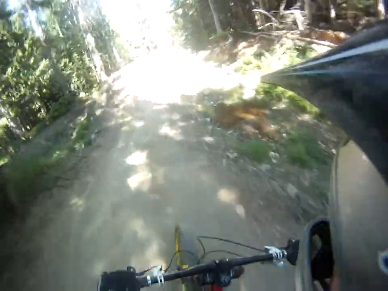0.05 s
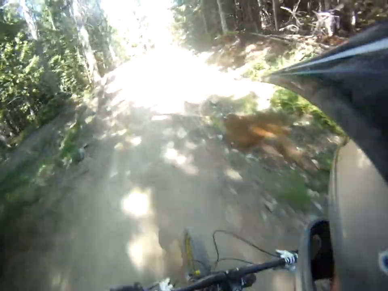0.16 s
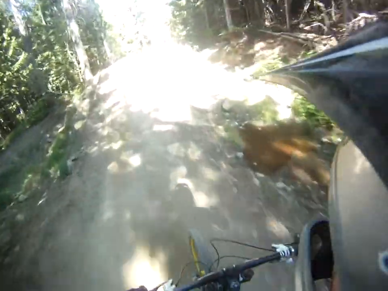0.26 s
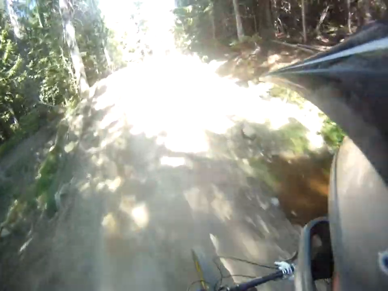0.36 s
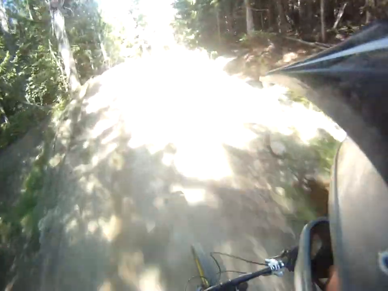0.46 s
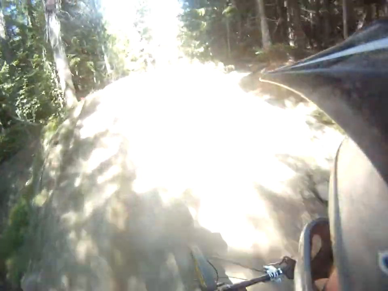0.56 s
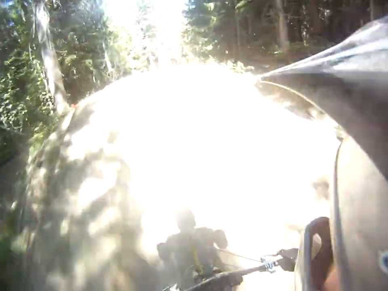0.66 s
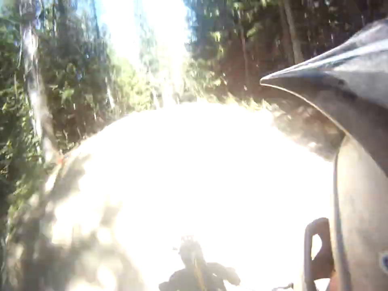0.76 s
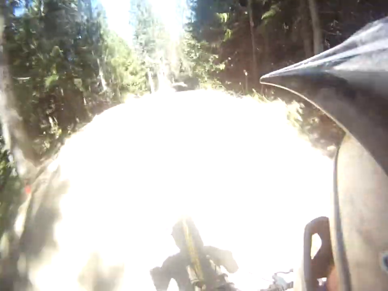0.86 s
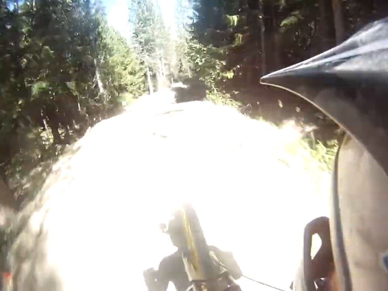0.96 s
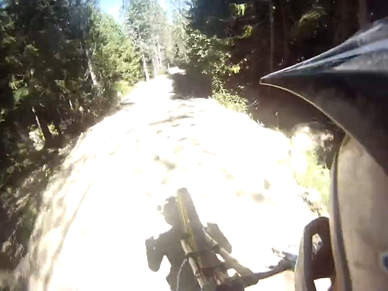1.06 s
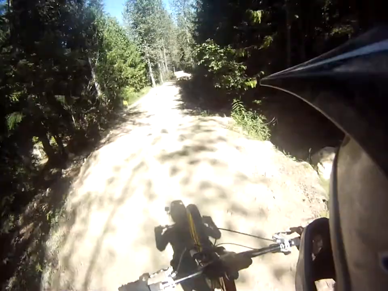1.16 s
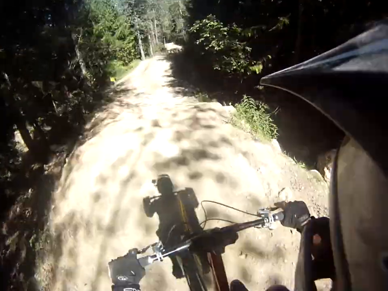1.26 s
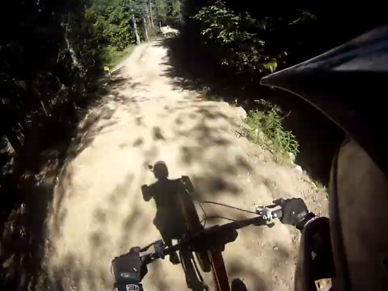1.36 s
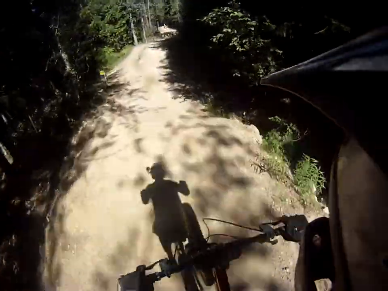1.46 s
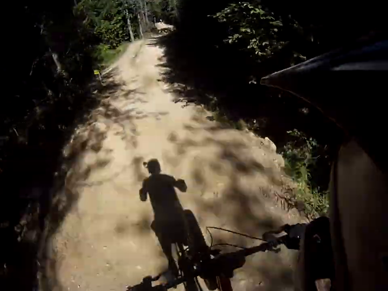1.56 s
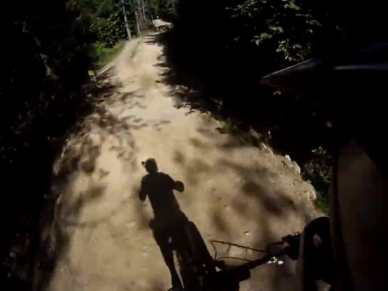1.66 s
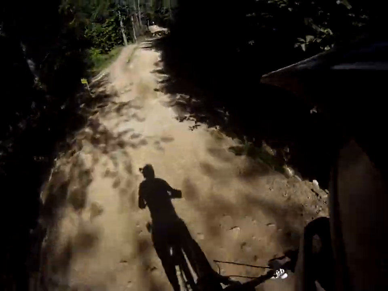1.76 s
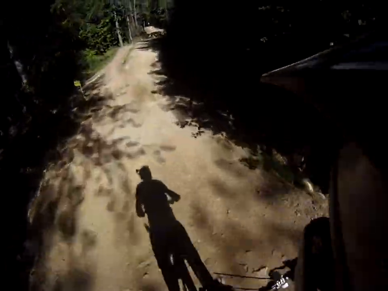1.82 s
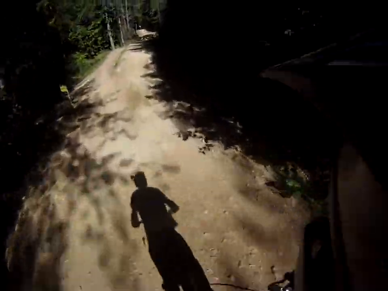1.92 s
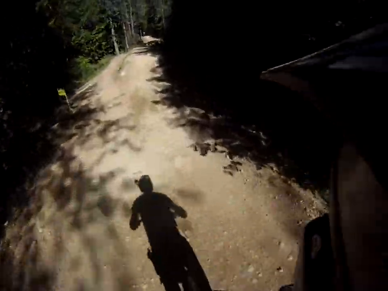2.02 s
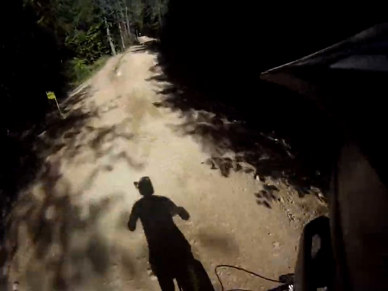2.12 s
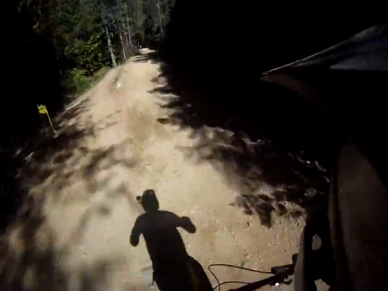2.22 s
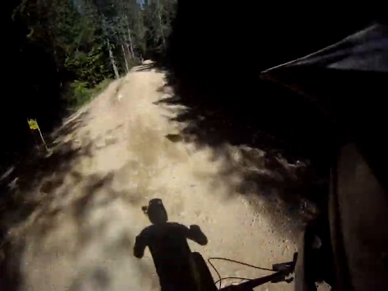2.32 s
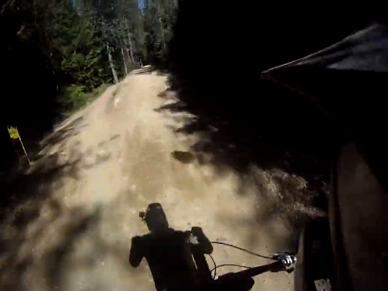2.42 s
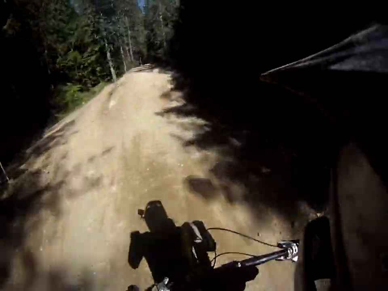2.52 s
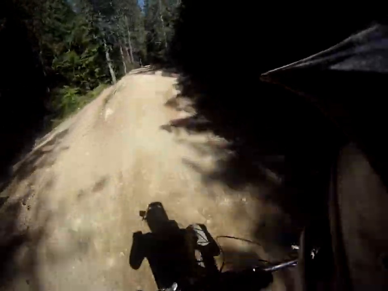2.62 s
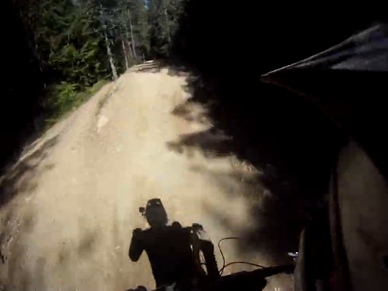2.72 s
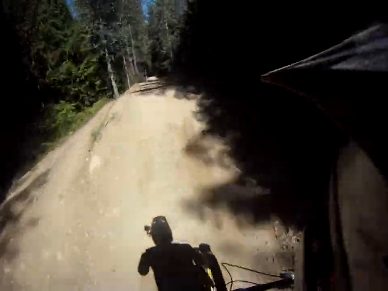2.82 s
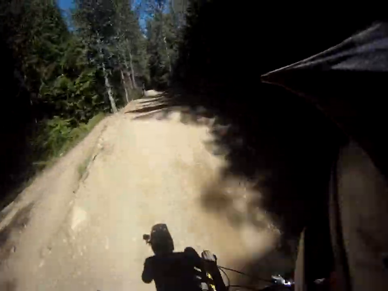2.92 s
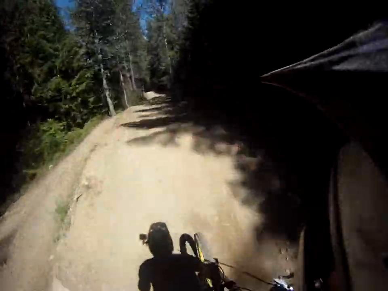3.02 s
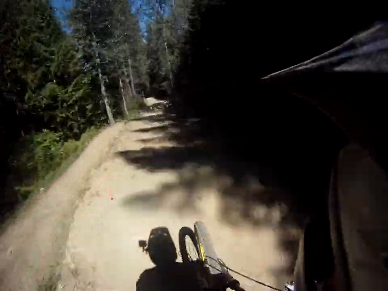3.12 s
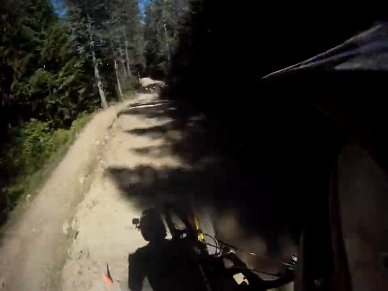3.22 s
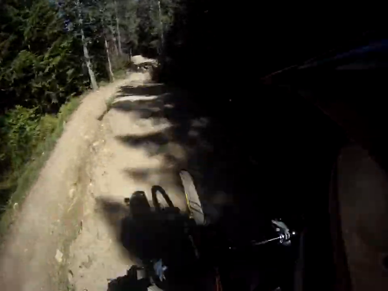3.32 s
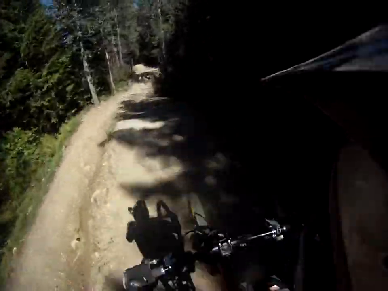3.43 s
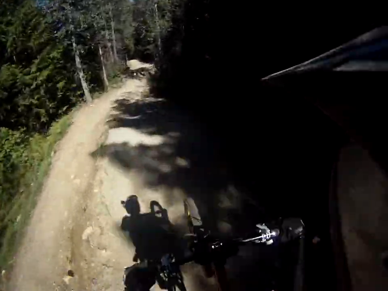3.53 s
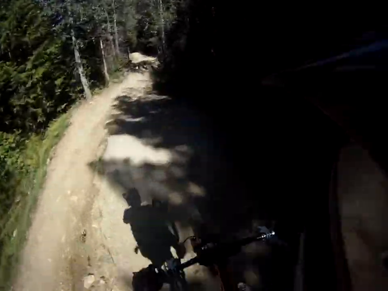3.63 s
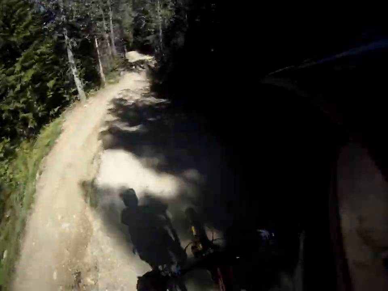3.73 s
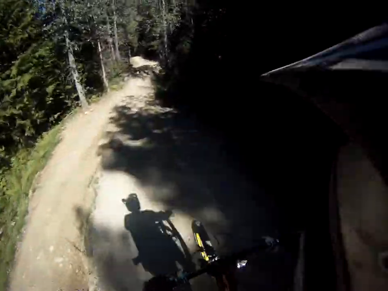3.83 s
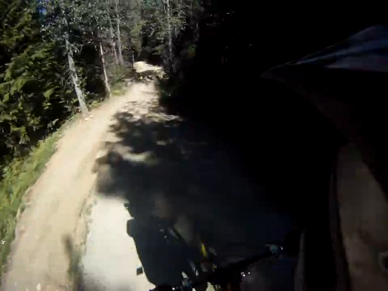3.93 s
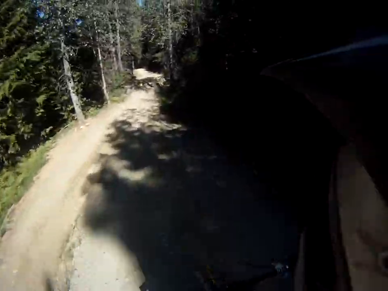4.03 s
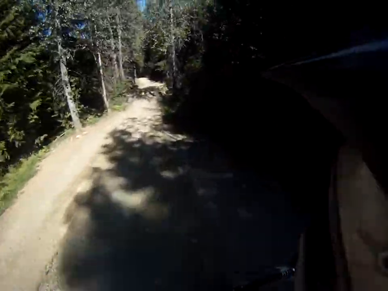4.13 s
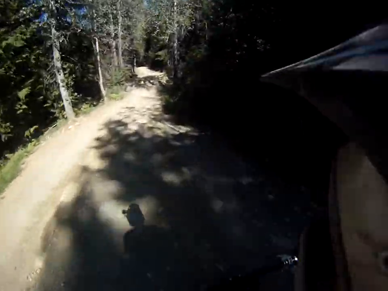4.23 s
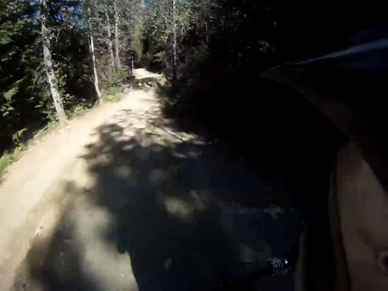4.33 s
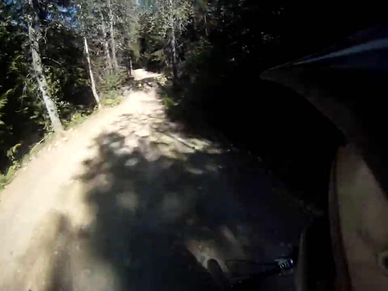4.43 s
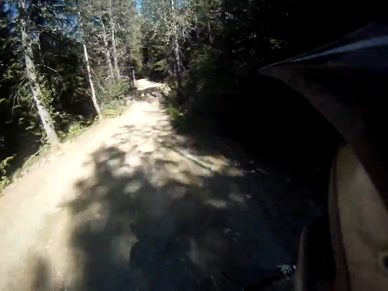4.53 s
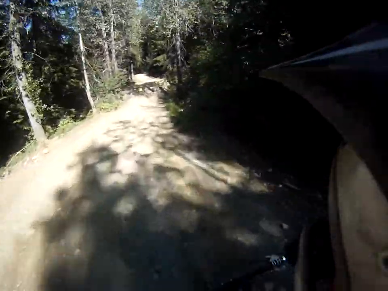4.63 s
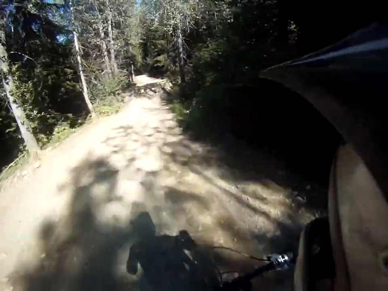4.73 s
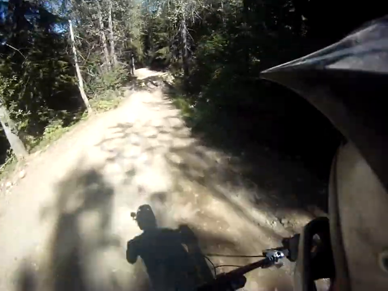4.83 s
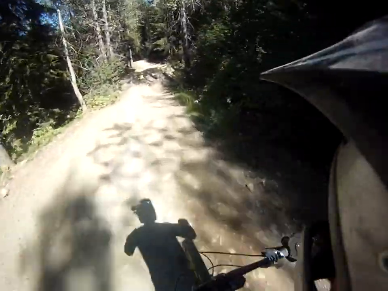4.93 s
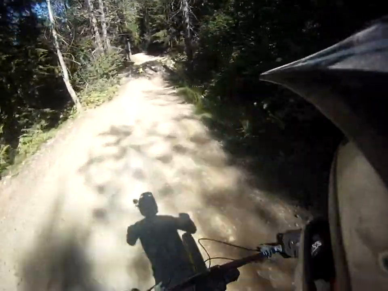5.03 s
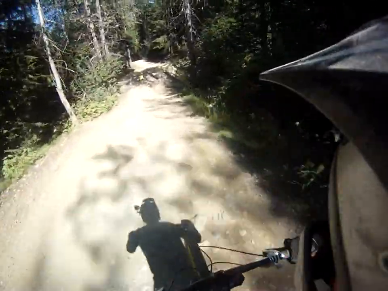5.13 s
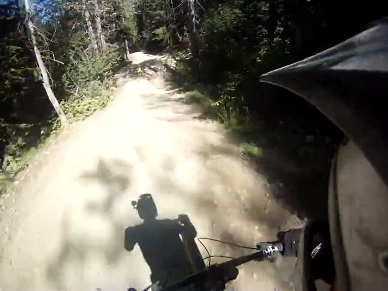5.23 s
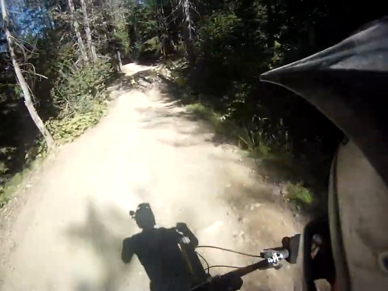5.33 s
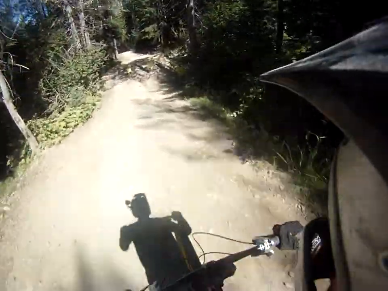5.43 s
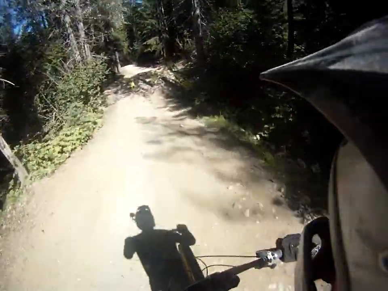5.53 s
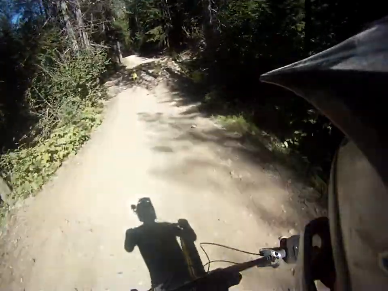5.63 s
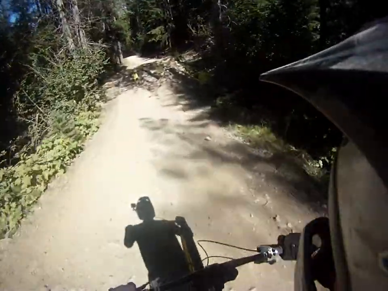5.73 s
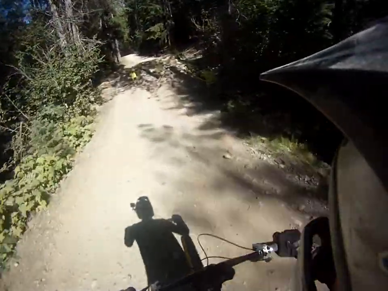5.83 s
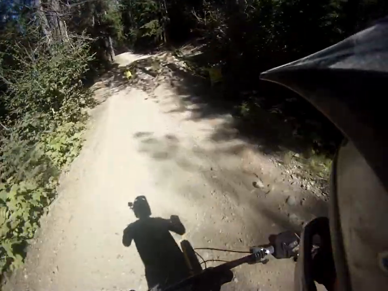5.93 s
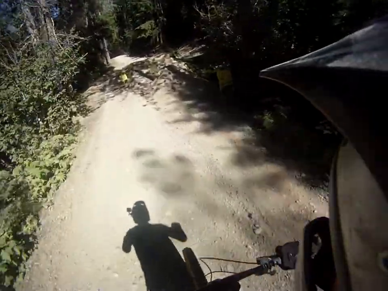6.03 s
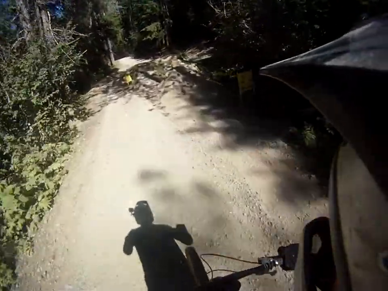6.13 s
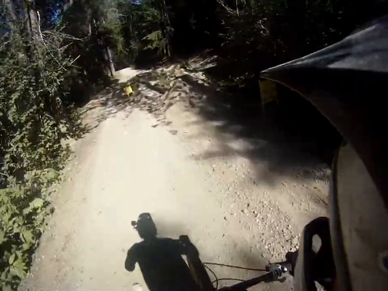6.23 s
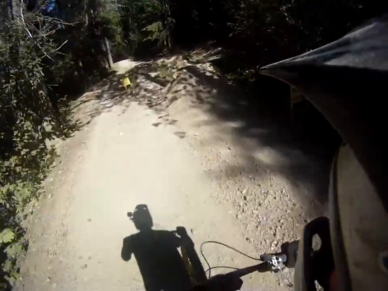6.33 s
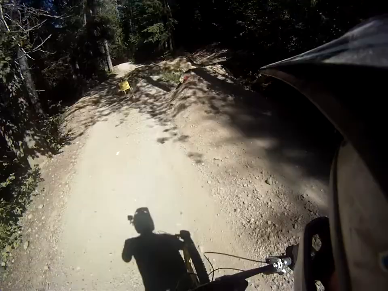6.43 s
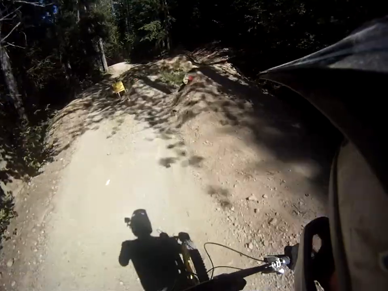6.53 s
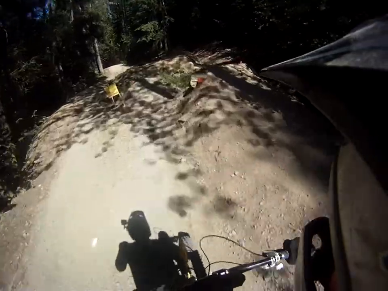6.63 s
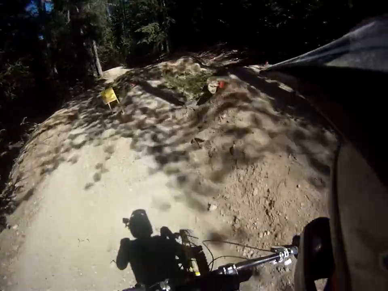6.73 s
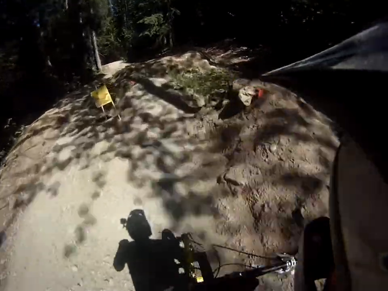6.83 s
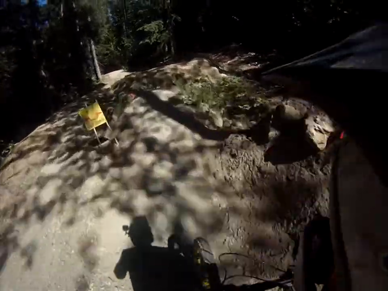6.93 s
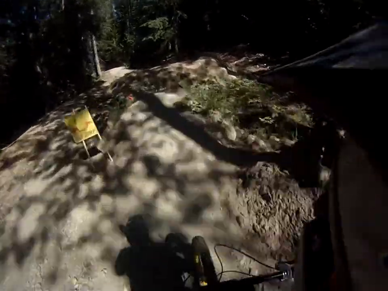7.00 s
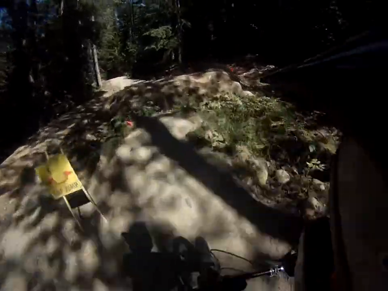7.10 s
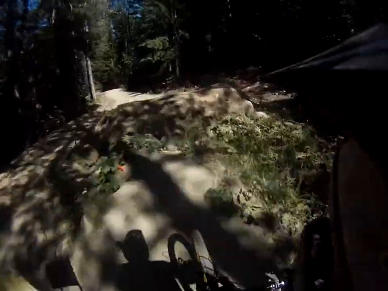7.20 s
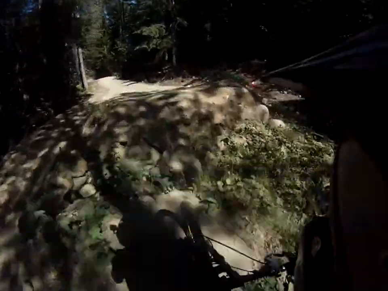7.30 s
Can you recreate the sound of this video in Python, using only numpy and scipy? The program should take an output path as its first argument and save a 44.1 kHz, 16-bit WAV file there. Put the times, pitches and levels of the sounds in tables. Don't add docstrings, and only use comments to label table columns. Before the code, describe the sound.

From a sealed camera on a helmet, boxy wind roar and gritty tyre hiss run down a hard dirt forest trail. The tyres nearly vanish at a jump, return with a knock, thin again, then a hard landing cracks the case. Dull strap taps and tiny stone ticks fall between; a cluster of loud plastic knocks comes near the end.

```python
import sys
import numpy as np
from scipy import signal
from scipy.fft import next_fast_len
from scipy.io import wavfile

SR = 44100
rng = np.random.default_rng(int(sys.argv[2]) if len(sys.argv) > 2 else 0)


def dump(signal):
    limited = np.clip(np.atleast_2d(signal).T, -1, 1)
    pcm = np.round(limited * 32767).astype(np.int16)
    wavfile.write(sys.argv[1], SR, pcm)


def ratio(d):
    e = np.asarray(d, float) / 20
    return 10 ** e


N = 324576

# time in seconds, level in dB above the mean.
AIR_STREAM = [(0.0, 3), (0.18, 2.5), (0.6, 0), (0.99, -0.5), (1.17, -8.5), (1.3, -3.5), (1.53, -7.5),
              (1.98, -1.5), (2.7, 1.1), (3.15, -0.5), (3.45, -5), (3.9, -4), (4.3, 0.5), (5.3, -0.4),
              (6.05, 1.4), (6.25, 2.5), (6.93, 3), (7.36, 1.3)]


def rms_one(x):
    return x / np.sqrt(np.mean(x ** 2) + 1e-20)


def peak_one(x):
    return x / np.abs(x).max()


def add(out, start_s, sound):
    at = round(start_s * SR)
    out[at:at + len(sound)] += sound[:N - at]


def in_time(rows):
    time_s, *columns = np.transpose(rows)
    return [np.interp(np.arange(N) / SR, time_s, column) for column in columns]


def drift(rate_hz):
    r = np.exp(-80 * np.pi * rate_hz / SR)
    noise = rng.standard_normal(N // 40 + 2002)
    slow = signal.lfilter([1], [1, -2 * r, r * r], noise)[2000:]
    return np.interp(np.arange(N) / 40, np.arange(len(slow)), rms_one(slow))


def band(x, low_hz, high_hz):
    return signal.sosfilt(signal.butter(2, [low_hz, high_hz], "band", fs=SR, output="sos"), x)


def resonate(x, hz, width_hz):
    r = np.exp(-np.pi * width_hz / SR)
    zeros = np.array([1, 0, -1]) * (1 - r * r) / 2
    return signal.lfilter(zeros, [1, -2 * r * np.cos(2 * np.pi * hz / SR), r * r], x)


def ring(x, hz, t60_s):
    r = ratio(-60 / (t60_s * SR))
    w = 2 * np.pi * hz / SR
    return signal.lfilter([0, np.sin(w)], [1, -2 * r * np.cos(w), r * r], x + 1e-18)


def struck(drive, modes):
    return sum(ratio(db) * ring(drive, hz, t60_s) for hz, db, t60_s in modes)


def blow(width_s):
    t = np.arange(4096) / SR
    return np.where(t < width_s, np.sin(np.pi * t / width_s) ** 2, 0)


def contact(length_s, rise_s):
    t = np.arange(4096) / SR
    burst = rng.standard_normal(4096) * np.exp(-t / max(length_s, 0.001)) * (1 - np.exp(-t / rise_s))
    return burst / np.sqrt(np.sum(burst ** 2))


def case(drive, modes, patchy_db):
    total = 0
    for k, (hz, width_hz, db) in enumerate(modes):
        gain = (-1) ** k * ratio(db + patchy_db * drift(5.6))
        total = total + gain * resonate(drive, hz, width_hz)
    return rms_one(total)


def wall(x):
    return signal.sosfilt(signal.butter(12, 3930, fs=SR, output="sos"), x)


def tent(start_s, hold_s, rise_db_s, fall_db_s):
    t = np.arange(N) / SR
    return -rise_db_s * np.maximum(start_s - t, 0) - fall_db_s * np.maximum(t - start_s - hold_s, 0)


def strongest(rest_db, events, fall_db_s):
    for start_s, db, hold_s in events:
        rest_db = np.maximum(rest_db, db + tent(start_s, hold_s, 290, fall_db_s))
    return rest_db + 2 * drift(17.0)


def ride():
    # time in seconds, level in dB above plain rolling.
    grip_rows = [(0.0, 2.5), (0.9, -1.5), (0.99, -5), (1.2, -21), (1.35, -11), (1.44, -21), (1.53, -19),
                 (1.8, -7.5), (1.98, -1), (2.5, 3.8), (3.15, -2), (3.5, -16), (3.7, -10), (4.1, -4.5),
                 (4.3, 1), (5.9, 0.9), (6.3, 5), (7.36, 1.5)]
    # start in seconds, extra load in dB, hold in seconds.
    presses = [(1.817, 2.5, 0.046), (2.038, 8, 0.066), (2.378, 7.5, .1), (3.28, 4, 0.029), (3.626, 2, 0.25),
               (3.98, 8.5, 0.043), (4.3, 4, 0.017), (4.562, 10.5, 0.028), (4.704, 9.5, .08),
               (4.892, 4, 0.045), (5.58, 1, 0.13), (5.927, 1.5, 0.033), (6.17, 4, 0.31), (6.775, 2.5, 0.14)]
    air_db, = in_time(AIR_STREAM)
    grip_db, = in_time(grip_rows)
    load_db = np.zeros(N)
    for start_s, db, hold_s in presses:
        load_db = np.maximum(load_db, db + tent(start_s, hold_s, rise_db_s=99, fall_db_s=56))
    roar_db = -41.5 + 0.99 * air_db + 0.29 * load_db
    rush_db = -34.5 + air_db + 0.5 * load_db
    rumble_db = -42.5 + 0.83 * grip_db + load_db
    fine_db = -53 + grip_db - 0.026 * load_db
    return roar_db, rush_db, rumble_db, fine_db


def shake():
    # start in seconds, level in dB, hold in seconds.
    jolts = [(0.0, -14, 0.0058), (0.155, -18.5, 0.0036), (0.235, -21.5, .01), (0.68, -29, 0.017),
             (0.805, -23, 0.05), (0.933, -22, 0.076), (1.082, -29, .02), (1.254, -23.5, 0.005),
             (2.05, -29.5, .02), (2.258, -32, .05), (2.52, -34, .07), (2.7, -29.5, 0.15), (3.087, -24, .01),
             (3.243, -19.5, 0.11), (3.375, -19.5, 0.023), (3.504, -26, 0.011), (4.227, -23, 0.096),
             (4.475, -30.5, 0.024), (4.79, -20, .01), (4.888, -18.5, 0.066), (5.05, -20.5, .01),
             (5.642, -21.5, .01), (5.735, -25.5, 0.046), (6.19, -35, .1), (6.42, -18.5, 0.056),
             (6.573, -17.5, 0.017), (6.762, -17, .01), (6.87, -24.5, 0.089), (7.113, -21, 0.028),
             (7.297, -24.5, 0.069)]
    # start in seconds, level in dB, hold in seconds.
    thumps = [(0.0, -28.5, 0.0037), (.14, -35.5, 0.046), (0.3, -36, 0.017), (0.813, -36.5, 0.073),
              (1.06, -37, .02), (2.06, -35.5, .01), (2.11, -31.5, 0.025), (2.42, -37, 0.011),
              (2.534, -31, .01), (2.73, -41, .05), (3.11, -39, 0.26), (3.437, -43, 0.026),
              (3.97, -42.5, .01), (4.148, -35, .01), (4.24, -25.5, 0.011), (4.287, -24.5, 0.017),
              (4.62, -34, 0.033), (4.77, -25, .02), (4.98, -35.5, .01), (5.066, -36, .01),
              (5.215, -39, .01), (5.564, -40, 0.11), (5.74, -36.5, 0.13), (5.907, -35, 0.011),
              (6.276, -28, .01), (6.403, -25, 0.065), (6.537, -24.5, 0.042), (6.763, -30, 0.022),
              (6.837, -25.5, 0.044), (7.3, -35.5, 0.059)]
    air_db, = in_time(AIR_STREAM)
    sway_db = strongest(-38.5 + 2.6 * air_db, jolts, fall_db_s=260)
    thump_db = strongest(-45.5 + 1.3 * air_db, thumps, fall_db_s=140)
    return sway_db, thump_db


def wind(roar_db, rush_db):
    # frequency in Hz, width in Hz, level in dB.
    roar_modes = [(549, 110, -13.5), (617, 42, -8.5), (861, 129, -4.5), (993, 33, 0), (1140, 110, -1)]
    # frequency in Hz, width in Hz, level in dB.
    rush_modes = [(1503, 161, -2.5), (1803, 133, 1.5), (1988, 216, 0.5), (2220, 136, 0.5), (2370, 425, -7)]
    stream = ratio(0.91 * drift(26.0)) * rng.standard_normal((2, N))
    roar = rms_one(band(case(stream[0], roar_modes, patchy_db=0.2), 220, 1800))
    rush = rms_one(band(case(stream[1], rush_modes, patchy_db=0.53), 1105, 3850))
    return ratio(roar_db + 0.2) * roar + ratio(rush_db - 0.92) * rush


def tyres(rumble_db, fine_db):
    # frequency in Hz, width in Hz, level in dB.
    grit_modes = [(2260, 326, 2.5), (2620, 64, -7.5), (3036, 430, -9), (3459, 99, 8.5), (3710, 250, 0)]
    # frequency in Hz, width in Hz, level in dB.
    fine_modes = [(4350, 270, -9.5), (4710, 250, -0.5), (4900, 320, -3), (5326, 400, -2), (5460, 130, 4),
                  (5800, 280, -6.5)]
    sizes = ratio(3.4 * np.minimum(rng.exponential(1, N), 5)) * rng.choice([-1, 1], N)
    born = rng.random(N) < 1500 * ratio(3.0 * drift(20.0)) / SR
    hiss = ratio(1.7 * drift(18.0)) * rng.standard_normal(N)
    drive = 0.17 * rms_one(sizes * born) + hiss
    fine = rms_one(band(case(drive, fine_modes, patchy_db=0.0), 4260, 6300))
    rumble = wall(case(drive, grit_modes, patchy_db=0.0))
    return ratio(rumble_db + 3.0) * rumble + ratio(fine_db + 3.0) * fine


def helmet_mode(hz, width_hz):
    swing = resonate(resonate(rng.standard_normal(N), hz, width_hz), hz, 1.05 * width_hz)
    height = np.abs(signal.hilbert(swing, next_fast_len(N))[:N])
    return rms_one(band(swing / (height + 1.05 * height.mean()), 0.51 * hz, 1.22 * hz))


def helmet(sway_db, thump_db):
    gentle_band = signal.butter(1, [110, 230], "band", fs=SR, output="sos")
    buffet = signal.sosfilt(gentle_band, rng.standard_normal(N))
    buffet = ratio(0.94 * drift(26.0)) * rms_one(buffet)
    pressure = ratio(-45.5) * rms_one(band(rng.standard_normal(N), 17, 45.4))
    sway = helmet_mode(38.6, width_hz=14.8)
    thump = helmet_mode(82.4, width_hz=33.5) + ratio(-13.5) * buffet
    return ratio(sway_db) * sway + ratio(thump_db) * thump + ratio(-51.0) * buffet + pressure


def ticks():
    # start in seconds, peak in dB, rattle length in seconds, lower part in dB.
    spits = [(1.17, -58, 0.0064, 5), (1.19, -54, 0.007, 3), (1.34, -49, 0.007, 3), (1.369, -41.5, 0.018, 1),
             (1.979, -37, 0.0086, -5), (3.386, -46, 0.0064, -5), (3.44, -26, 0.0016, 3.5),
             (3.558, -48, 0.0065, 5), (3.579, -47, 0.007, 2), (4.124, -71, 0.007, 10),
             (4.14, -42, 0.007, -10)]
    # start in seconds, peak in dB, pitch in Hz.
    pings = [
        (0.0707, -36, 4600),
        (4.157, -34, 4700),
        (4.6902, -38, 5460),
        (4.7835, -36, 4670),
        (6.2931, -35, 4720),
        (6.68, -32.5, 4620),
        (5.242, -37, 5800),
    ]
    # frequency in Hz, level in dB, t60 in seconds.
    bright_modes = [(1730, 20, 0.0087), (2100, -6, .006), (2700, -25, 0.0054), (3540, 21, 0.016),
                    (3830, -20, .008)]
    out = np.zeros(N)
    for start_s, peak_db, length_s, lower_db in spits:
        hit = contact(length_s, rise_s=0.08 * length_s)
        spit = peak_one(band(hit, 3900, 5730))
        spit = spit + ratio(lower_db + 0.5) * peak_one(struck(hit, bright_modes))
        spit = spit + ratio(-3.0) * peak_one(band(hit, 1400, 6700))
        add(out, start_s, ratio(peak_db + 6.0) * spit)
    for start_s, peak_db, hz in pings:
        rung = ring(contact(0.0014, rise_s=0.00065), hz, t60_s=0.011)
        add(out, start_s, ratio(peak_db + 3.5) * peak_one(resonate(rung, hz, width_hz=600)))
    return out


def taps():
    # start in seconds, peak in dB, pitch in Hz, upper part in dB, lower part in dB.
    tap_rows = [(0.151, -25, 990, -9, -5), (0.798, -33, 1500, -10, 4), (0.92, -24.5, 1120, -5, -3),
                (1.156, -25.5, 986, -12, 0), (1.181, -27.5, 990, -12, -8), (1.2, -39, 1120, -8, -8),
                (1.223, -29.5, 1040, -8, 3), (1.427, -23, 995, -6, -17), (1.823, -24.5, 1560, -14, 2),
                (2.519, -23, 1530, -5, 1), (3.299, -24.5, 1040, -5, -1), (3.419, -23.5, 1140, -1, -11),
                (3.562, -20.5, 1340, -8, -14), (4.761, -24, 1090, -12, -1), (6.637, -40, 1090, -10, -8),
                (3.163, -25.5, 1140, -6, -22), (3.265, -32, 930, -21, 10), (3.325, -30, 1090, -10, -6),
                (3.348, -32, 1120, -12, -1), (3.376, -30, 1000, -10, 3)]
    t60_s = 0.028
    out = np.zeros(N)
    for start_s, peak_db, hz, upper_db, lower_db in tap_rows:
        modes = [(hz, 0, t60_s), (0.71 * hz, lower_db, t60_s), (1.8 * hz, upper_db, 1.1 * t60_s)]
        hit = blow(0.00023) + 0.99 * contact(0.002, rise_s=0.001)
        padded = resonate(struck(hit, modes), 1.25 * hz, 1.4 * hz)
        add(out, start_s, ratio(peak_db + 1.5) * peak_one(band(padded, 570, 3400)))
    return out


def knocks():
    # start in seconds, peak in dB, hollow part in dB, low thud in dB,
    # rattle length in seconds.
    knock_rows = [(2.041, -10, -7.5, -13, 0.0032), (2.094, -30, -2, -23, 0.0078),
                  (4.211, -2.5, -10, -20, 0.0074), (4.271, -9, -7.5, -12, 0.0044),
                  (4.713, -7, -14.5, -16.5, 0.0053), (5.791, -13.5, -9, -20, 0.0067),
                  (6.227, -10, -8.5, -14.5, 0.0038), (6.298, -27, 3.5, -16, 0.013),
                  (6.373, -1.5, -12, -19, 0.0037), (6.445, -7, -12.5, -16.5, 0.008),
                  (6.535, -0.5, -14, -19, 0.0044), (6.576, -8.5, -17, -15, 0.004),
                  (6.588, -8, -13, -9.5, 0.0068), (6.729, -8, -10.5, -11, 0.0073),
                  (6.822, 1.5, -13, -17.5, 0.0054)]
    # frequency in Hz, level in dB, t60 in seconds.
    shell_modes = [(2210, 4, 0.041), (2380, 5, 0.022), (2573, 1, 0.023), (2840, -3.5, 0.0088),
                   (3150, -1.5, 0.0055), (3520, -3.5, 0.032), (3720, 6, 0.012), (3750, -9, 0.0079)]
    hollow_modes = [(717, -6.5, 0.11), (812, -4, 0.092), (990, -12, 0.034), (1104, 4.5, 0.061),
                    (1135, -5, 0.11), (1500, -1, 0.023), (1754, 0, 0.018)]
    thud_modes = [(148.4, -3.5, 0.16), (243, -9, 0.051)]
    out = np.zeros(N)
    for start_s, peak_db, hollow_db, thud_db, length_s in knock_rows:
        hard = blow(0.00021) + 2.9 * contact(length_s, rise_s=0.00022)
        shell = peak_one(band(band(struck(hard, shell_modes), 2070, 4680), 1050, 4300))
        soft = 0.19 * blow(0.00055) + 2.7 * contact(1.2 * length_s, rise_s=0.0099)
        soft = np.roll(soft, 100)
        hollow = ratio(hollow_db + 4.0) * peak_one(band(struck(soft, hollow_modes), 685, 2210))
        loose = contact(2.0 * length_s, rise_s=0.00067)
        crunch = ratio(-13.0) * peak_one(band(loose, 420, 3900))
        thud = ratio(thud_db - 3.5) * peak_one(struck(soft, thud_modes))
        add(out, start_s, ratio(peak_db - 4.0) * (shell + hollow + thud + crunch))
    return wall(out) + ratio(-13) * out


def scene():
    roar_db, rush_db, rumble_db, fine_db = ride()
    sway_db, thump_db = shake()
    roar_db = roar_db + 0.056 * (sway_db - sway_db.mean())
    steady = wind(roar_db, rush_db) + tyres(rumble_db, fine_db) + helmet(sway_db, thump_db)
    return (steady + ticks() + taps() + knocks())[None]


def top_cut(x):
    return signal.sosfilt(signal.butter(12, 15980, fs=SR, output="sos"), x)


def record(dry):
    hold_hz, cutoff_hz = 12000, 15300
    limited = 0.87 * np.tanh(dry / 0.94)
    guarded = signal.sosfilt(signal.butter(8, 5800, fs=SR, output="sos"), limited)
    coarse = signal.resample_poly(guarded, hold_hz // 300, SR // 300, axis=1)
    held = np.repeat(coarse, 4, axis=1)
    back = signal.resample_poly(held, SR // 300, 4 * hold_hz // 300, axis=1)[:, :N]
    back = np.pad(back, ((0, 0), (0, N - back.shape[1])))
    steep = signal.ellip(12, 0.05, 40, cutoff_hz - 40, fs=SR, output="sos")
    edge = signal.sosfiltfilt(steep, back)
    leak_filter = signal.butter(10, cutoff_hz + 150, fs=SR, output="sos")
    leak = signal.sosfiltfilt(leak_filter, back - edge)
    return top_cut(edge + ratio(-25) * leak)


dry = scene()
out = record(dry)
dump(out)
```